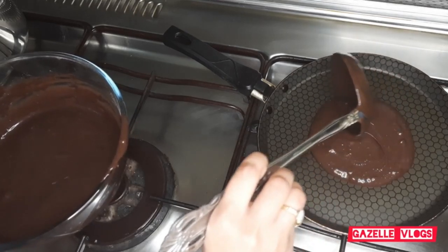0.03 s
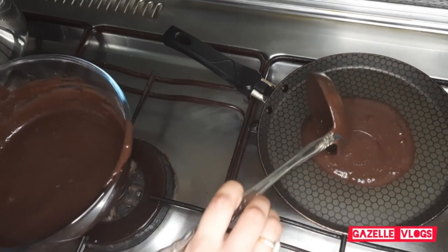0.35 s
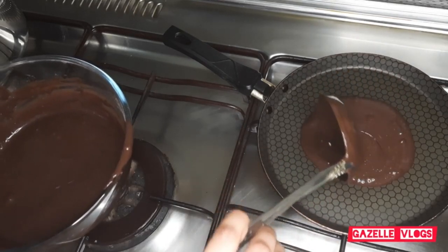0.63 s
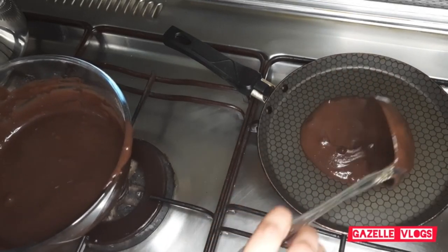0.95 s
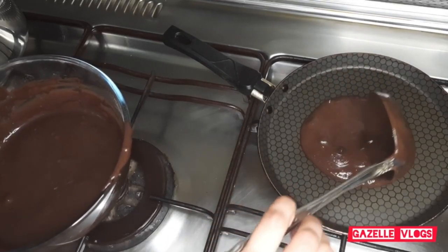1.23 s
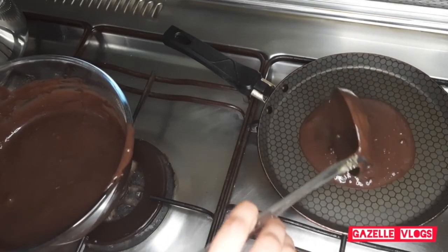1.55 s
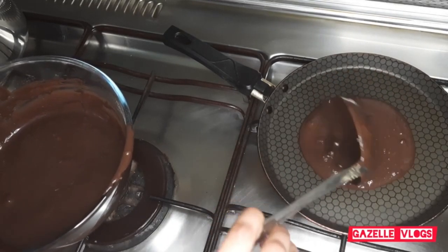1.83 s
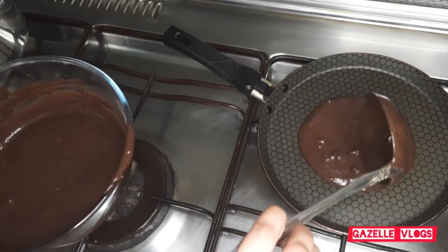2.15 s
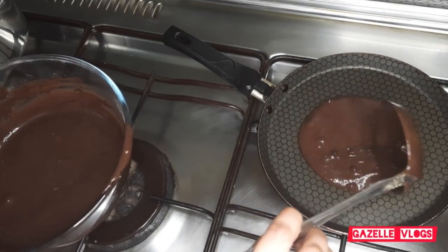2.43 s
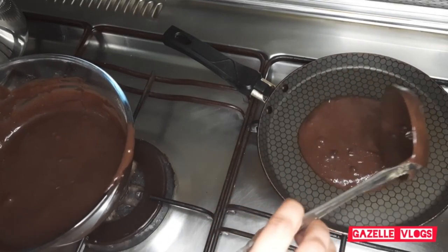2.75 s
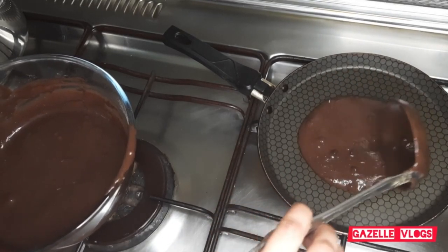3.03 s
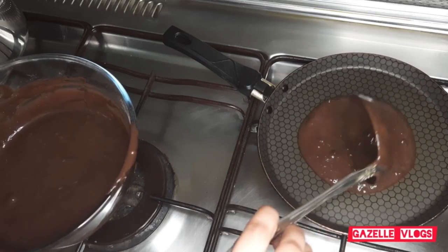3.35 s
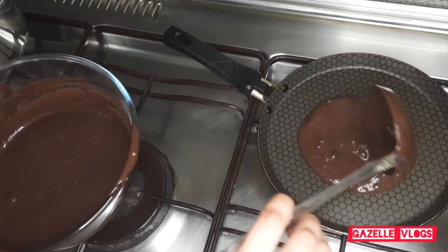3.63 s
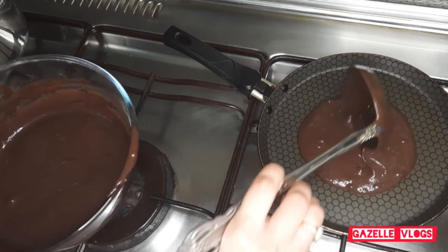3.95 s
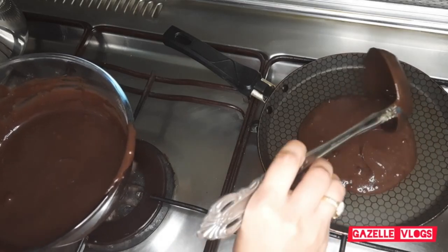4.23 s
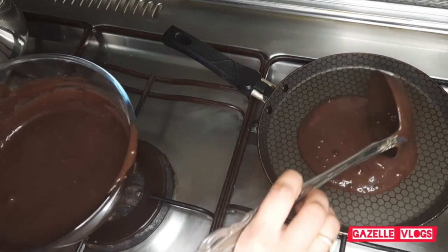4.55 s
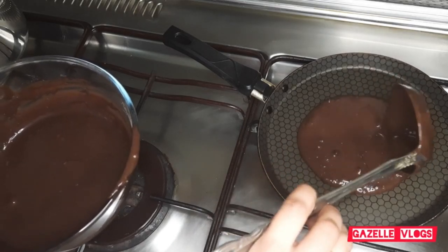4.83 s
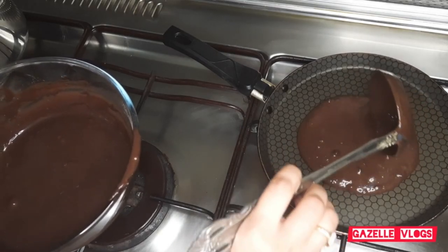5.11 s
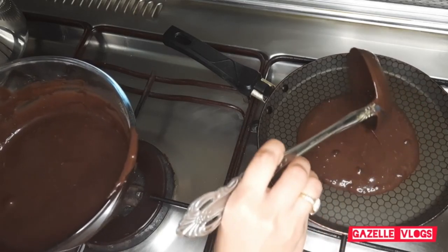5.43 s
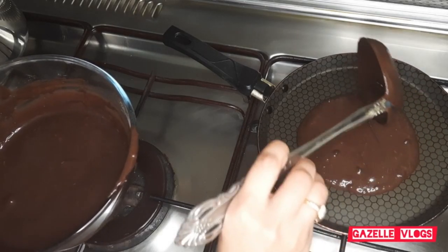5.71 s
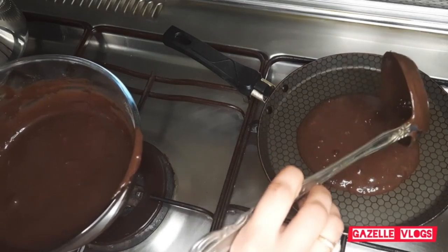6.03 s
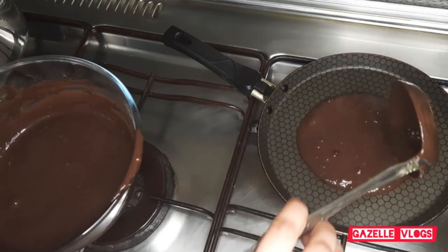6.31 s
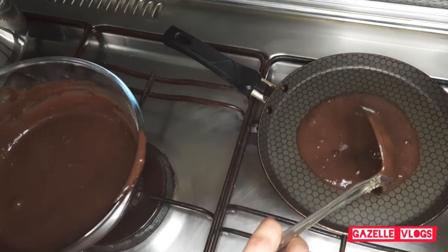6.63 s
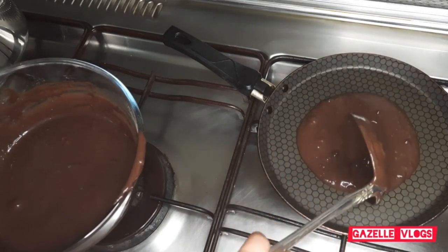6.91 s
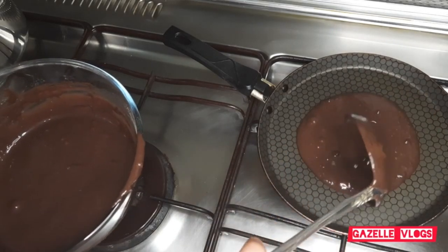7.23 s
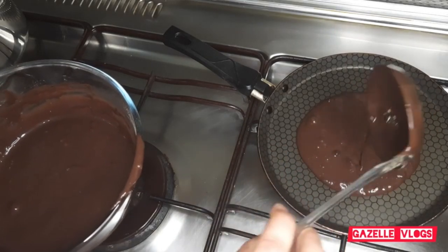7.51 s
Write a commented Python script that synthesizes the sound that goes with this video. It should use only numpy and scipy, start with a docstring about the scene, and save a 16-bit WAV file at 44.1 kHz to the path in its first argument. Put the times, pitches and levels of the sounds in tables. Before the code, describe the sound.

Batter sizzles softly in a hot pan, swelling with each ladle sweep, over a gas burner's rush and a low hum.

```python
"""Batter sizzling in a hot pan

A ladle spreads batter round a pan on a gas stove, a little to the right. Each sweep pushes
wet batter onto bare metal: a swarm of tiny steam bursts swells, then settles to a fine fizz
with lone pops. The ladle softly rubs the pan. Underneath, a kitchen motor and the mains hum,
the burner rushes and faintly sings, and a deep drone comes and goes."""
import sys
import numpy as np
from scipy import signal
from scipy.fft import rfft, irfft
from scipy.io import wavfile
from scipy.ndimage import uniform_filter1d

SR = 44100
rng = np.random.default_rng(int(sys.argv[2]) if len(sys.argv) > 2 else 0)


def wav_record(signal):
    """Record a signal, one row per channel, as 16-bit PCM in the file named by sys.argv[1]."""
    frames = np.transpose(np.atleast_2d(signal))
    bounded = np.clip(frames, -1, 1)
    # unit amplitude maps onto the largest positive 16-bit level
    quanta = np.round(bounded * 32767).astype(np.int16)
    wavfile.write(sys.argv[1], SR, quanta)


N = 342657
TIME = np.arange(N) / SR
FREQS = np.maximum(np.fft.rfftfreq(N, 1 / SR), 1)

# Tones of the motor, the mains and a slower hum that beats with them: pitch_hz, level_db
HUM_TONES = [(98.33, -50.7), (100, -64), (144.4, -57.5), (147.5, -52.5), (196.67, -52), (200, -70),
             (245.83, -69), (288.6, -73), (393.33, -73), (442.5, -77), (500, -78), (540.83, -69),
             (590, -73), (639.2, -79), (688.3, -79)]
# Spells of the deep drone: start_s, length_s, level_db
DRONE_SPELLS = [(-.3, 1.3, -43), (1.5, 0.71, -42), (2.345, 0.27, -44.5), (4.055, .32, -50)]
# The restless rumble under the drone: time_s, level_db
RUMBLE_LEVELS = [(0, -57), (3.2, -56.5), (3.75, -60), (4.6, -55.5), (5.4, -63), (6.3, -57), (7.77, -56)]
# Loudness of the burner's rush: time_s, level_db
FLAME_LEVELS = [(0, -53), (.8, -54), (1.3, -57), (2.1, -54), (3.8, -59.5), (4.4, -57), (5.0, -59.5),
                (5.5, -56), (6.3, -59.5), (7.77, -57.5)]
# Tone colour of that rush: frequency_hz, level_db
FLAME_SPECTRUM = [(25, -19), (60, -2.5), (90, -0.5), (135, 7.5), (170, -2), (215, 8), (275, -3.5),
                  (335, 0.5), (430, -4.5), (560, -5), (750, -13), (960, -17), (1300, -26.5), (3000, -31.5)]
# How it spreads between the ears: frequency_hz, share_alike (0 to 1), left_minus_right_db
FLAME_SPREAD = [(60.7, 1, -13), (188, 0.77, -0.5), (367, 0.59, 3), (690, 0.75, 3.5), (1370, 0, -3.5)]
# Where the gas jet rings the burner: pitch_hz, width_hz, level_db, left_minus_right_db
JET_RINGS = [(1746, 185, -77.5, 20), (3283, 105, -83, 4), (3640, 240, -84, -12), (6770, 440, -83, -19)]
# Faint whistles of the jet: pitch_hz, level_db
JET_WHISTLES = [(3392, -84.5), (3590, -84.5), (6535, -86.5)]
# Where the rubbed pan rings: pitch_hz, width_hz, level_db
PAN_RINGS = [(841, 40, 4.5), (972, 12.5, 1.5), (1070, 280, -5), (1540, 46, -18)]
# The ladle's back slides over the pan: middle_s, half_length_s, level_db
RUB_STROKES = [(.45, 1, -67.5), (1.874, 0.24, -66.5), (2.75, 0.76, -73), (5.4, 0.72, -73),
               (7.13, 0.56, -70)]
# Tone colour of the steam bursts: frequency_hz, left_db, right_db
STEAM_SPECTRUM = [(1270, -11, -11.5), (2560, -4, -15), (2610, -12, -10.5), (3820, -14.5, -3.5),
                  (5650, -11.5, -4.5), (6270, -9.5, -3.5), (6800, -17, 1.5), (7100, -16, -0.5),
                  (8320, -19, -0.5), (9740, -14, -7), (11020, -13.5, -1.5), (14100, -5, 0),
                  (15600, -6, -0.5)]
# How much of the steam both ears hear alike: frequency_hz, share_alike (0 to 1)
STEAM_SPREAD = [(2000, .02), (8000, .05), (11000, .25), (13500, .8), (15500, .9)]
# Larger bubbles that burst: time_s, level_db
BUBBLE_POPS = [(0.7542, -35), (0.9757, -42), (1.9784, -37), (2.0413, -39), (2.1221, -41), (3.1787, -31),
               (3.3682, -33.5), (3.5458, -27), (4.0502, -42), (4.5775, -40), (5.3009, -39), (5.5957, -39),
               (5.7014, -33.5), (5.7453, -37.5), (5.7683, -39), (5.9514, -42), (6.1474, -43), (6.1823, -44),
               (6.6303, -44), (6.9621, -42), (7.414, -44)]
# Where the hollow under the ladle rings: pitch_multiple, width_hz, level_db, left_minus_right_db
HOLLOW_RINGS = [(.7, 230, -21, 21), (1, 458, 4, 5.5)]
# Fizz of the batter already lying in the pan: time_s, level_db
SIMMER_LEVELS = [(0, -53), (.78, -54.5), (1.1, -71), (1.3, -69), (1.7, -64.5), (2.42, -67.5), (3.3, -63.5),
                 (4.6, -59.5), (5.0, -56.5), (5.45, -57.5), (6.4, -65), (7.77, -65)]
# Slow drift of the fizz's brightness: time_s, top_treble_boost_db
FIZZ_BRIGHTNESS = [(0, 0.5), (1.8, 2), (3.6, -3), (4.35, 1.5), (4.85, -2), (5.3, 0), (7.77, -1)]
# The ladle pushes wet batter onto bare metal:
# start_s, rise_s, length_s, fall_db_per_s, fizz_db, hiss_db, splutter_db, hollow_pitch_hz
LADLE_SWEEPS = [(-0.05, 0.046, .2, 18, -55, -65, -66.5, 1470),
                (0.64, 0.043, 0.14, 57, -57, -63.5, -80, 1900),
                (1.334, 0.092, 0.15, 84, -50.5, -59, -69, 2060),
                (1.67, 0.12, 0.29, 56, -53.5, -63.5, -75, 2000),
                (1.957, 0.12, 0.098, 114, -54, -60, -74, 2350),
                (2.453, 0.092, 0.17, 85, -57, -65.5, -86, 2400),
                (2.96, 0.082, 0.16, 81, -53, -61, -69.5, 2430),
                (3.235, 0.22, 0.25, 76, -59, -75, -79, 2400),
                (3.463, 0.1, 0.14, 79, -48, -58.5, -69.5, 2540),
                (3.837, 0.068, 0.1, 41, -60, -69.5, -86.5, 2400),
                (4.175, 0.089, 0.21, 60, -51, -63.5, -68.5, 2390),
                (4.702, 0.1, 0.14, 138, -46, -59.5, -65, 2600),
                (5.288, 0.099, .23, 79, -55, -64.5, -65.5, 2130),
                (6.846, 0.075, 0.11, 86, -59, -68, -87, 2300),
                (7.129, 0.087, 0.13, 80, -53, -63, -89, 2300)]


def undb(db):
    """Turn decibels into a number to multiply by."""
    return 10 ** (np.asarray(db) / 20)


def curves(table):
    """Join the points of a time table: one value per sample for each column."""
    times, *columns = np.transpose(table)
    return [np.interp(TIME, times, column) for column in columns]


def spectra(table):
    """Join the points of a frequency table: one value per frequency for each column."""
    hz, *columns = np.transpose(table)
    return np.array([np.interp(np.log(FREQS), np.log(hz), column) for column in columns])


def shape(x, gain):
    """Filter a sound: turn each frequency up or down by its gain."""
    return irfft(rfft(x) * gain, N)


def above(hz, order=8):
    """Gains that let through what lies above hz."""
    return 1 / np.sqrt(1 + (hz / FREQS) ** (2 * order))


def resonance(hz, width):
    """Gains that let through one peak around hz."""
    return 1 / (1 + ((FREQS - hz) / width) ** 2)


def unit(x, band_hz=(1, SR)):
    """Scale a stereo sound so the average of its sides has strength (rms) 1 inside a band."""
    inside = shape(x.mean(axis=0), (FREQS >= band_hz[0]) & (FREQS <= band_hz[1]))
    return x / inside.std()


def balance(db):
    """Left and right gains; positive db leans left."""
    return undb(np.array([[db], [-db]]) / 2)


def blend(three, alike):
    """Make left and right from one shared signal and two separate ones."""
    alike = np.clip(alike, 0, 1)
    return shape(three[0], np.sqrt(alike)) + shape(three[1:], np.sqrt(1 - alike))


def wander(rate_hz):
    """A smooth random wobble, typically of size 1."""
    x = shape(rng.standard_normal(N), 1 / (1 + (FREQS / rate_hz) ** 4))
    return x / x.std()


def surge(start, length, rise_s, fall_db_per_s):
    """A loudness curve: rise smoothly, hold until the length is up, then fade."""
    age = TIME - start
    rise = np.sin(np.pi / 2 * np.clip(age / rise_s, 0, 1)) ** 2
    return rise * undb(-fall_db_per_s * np.maximum(age - length, 0))


def hum(gain_db=-0.54, waver_db=0.77):
    """The motor and mains hold slightly wavering tones; close pairs throb against each other."""
    out = 0
    for hz, db in HUM_TONES:
        phase = 2 * np.pi * (hz * TIME + rng.random()) + .1 * wander(1.5)
        out = out + np.sqrt(2) * undb(db + waver_db * wander(5.3)) * np.sin(phase)
    return out * undb(gain_db) * balance(-1.2)


def drone(hz=46, wander_hz=1.03, spell_gain_db=-2.4, rumble_width_hz=4.4):
    """A deep, unsteady tone comes in spells, over a restless rumble at the same pitch."""
    phase = 2 * np.pi * np.cumsum(hz + wander_hz * wander(3.9)) / SR
    spells = sum(undb(db + spell_gain_db) * surge(start, length, rise_s=0.25, fall_db_per_s=100)
                 for start, length, db in DRONE_SPELLS)
    tone = np.sqrt(2) * np.sin(phase) * spells
    rumble = wander(rumble_width_hz) * np.sin(phase) + wander(rumble_width_hz) * np.cos(phase)
    return (tone + undb(curves(RUMBLE_LEVELS)[0]) * rumble) * balance(-3.3)


def flame(gain_db=-1.55, roll_off_hz=3500):
    """Burning gas makes a soft, flickering rush under the pan."""
    alike, side_db = spectra(FLAME_SPREAD)
    colour = undb(spectra(FLAME_SPECTRUM) + np.array([side_db, -side_db]) / 2)
    colour /= 1 + (FREQS / roll_off_hz) ** 4
    noise = blend(rng.standard_normal((3, N)), alike)
    rush = unit(shape(noise, colour), band_hz=(260, 1100))
    flicker_db = .5 * wander(8)
    return rush * undb(curves(FLAME_LEVELS)[0] + gain_db + flicker_db)


def gas_jet(waver_hz=4):
    """Gas hisses through the nozzle, makes the burner ring and whistles faintly."""
    out = 0
    for hz, width, db, side_db in JET_RINGS:
        ring = shape(rng.standard_normal((2, N)), resonance(hz, width))
        out = out + unit(ring * balance(side_db)) * undb(db + 2 * wander(22))
    for hz, db in JET_WHISTLES:
        phase = 2 * np.pi * np.cumsum(hz + waver_hz * wander(8.5)) / SR
        out = out + np.sqrt(2) * undb(db + 2 * wander(1.9)) * np.sin(phase)
    return out


def ladle_rub(gain_db=1.7, judder_db=2.0, light_touch_db=-88):
    """The ladle slides unevenly on a film of batter and softly rings the pan."""
    body = sum(resonance(hz, width) * undb(db) for hz, width, db in PAN_RINGS)
    friction = blend(rng.standard_normal((3, N)), alike=.3)
    ring = unit(shape(friction, body) * balance(2))
    strokes = sum(undb(db) ** 2 * np.exp(-((TIME - middle) / half) ** 2)
                  for middle, half, db in RUB_STROKES)
    power = undb(light_touch_db) ** 2 + strokes
    return ring * np.sqrt(power) * undb(gain_db + judder_db * wander(11))


def pan_squeak(middle_s=5.47, half_s=0.29, hz=975, glide_hz=25, level_db=-72):
    """During one slow stroke the rubbed pan sings two faint, slightly rising tones."""
    along = (TIME - middle_s) / half_s
    phase = 2 * np.pi * np.cumsum(hz + glide_hz * np.tanh(along) + 8 * wander(25.8)) / SR
    tones = np.sin(phase) + undb(-6) * np.sin(1.49 * phase)
    return np.sqrt(2) * tones * np.exp(-along ** 4) * undb(level_db + 2 * wander(15))


def swarm(per_s, spread_db):
    """Energies of randomly timed bursts, mostly small; the average power is the same at any rate."""
    chance = np.clip(per_s / SR, 1e-4, 1)
    sizes = undb(spread_db * np.minimum(rng.exponential(size=N), 6))
    return (rng.random(N) < chance) * sizes ** 2 / chance


def steam(energy, burst_s, echo_db, echo_s):
    """Each steam burst is a short puff of noise with a faint kitchen echo."""
    t = TIME[:SR // 3]
    decay = np.exp(-2 * t / burst_s) + undb(echo_db - 60 * t / echo_s) ** 2
    loudness = np.sqrt(np.abs(signal.fftconvolve(energy, decay)[:N]))
    return blend(loudness * rng.standard_normal((3, N)), spectra(STEAM_SPREAD)[0])


def pops(gain_db=4.0, low_cut_hz=5500):
    """Lone bubbles break with a sharp, thin tick."""
    energy = np.zeros(N)
    for time_s, db in BUBBLE_POPS:
        energy[int(time_s * SR)] += undb(db + gain_db) ** 2
    ticks = steam(energy, burst_s=.0009, echo_db=-32, echo_s=.15)
    return shape(ticks, undb(spectra(STEAM_SPECTRUM)) * above(low_cut_hz, order=2))


def splutter(gain_db=2.3, lag_s=0.023):
    """Steam gathers under the ladle just after a sweep starts and splutters in the hollow there."""
    bursts = steam(swarm(per_s=3000, spread_db=1.5), burst_s=.0012, echo_db=-20, echo_s=.3)
    out = 0
    for start, rise, length, fall, _, _, db, hz in LADLE_SWEEPS:
        hollow = sum(resonance(hz * multiple, width) * undb(ring_db) * balance(side_db)
                     for multiple, width, ring_db, side_db in HOLLOW_RINGS)
        ring = shape(bursts, hollow)
        swell = surge(start + lag_s, length, rise, fall)
        out = out + ring / ring.mean(axis=0).std() * swell * undb(db + gain_db)
    return out


def boiling_levels(simmer_hiss_db=-10.5, uneven_db=0.9):
    """Fizz and hiss levels in dB: a simmer plus a surge for each sweep, never quite even."""
    simmer_db = curves(SIMMER_LEVELS)[0]
    fizz, hiss = undb(simmer_db) ** 2, undb(simmer_db + simmer_hiss_db) ** 2
    for start, rise, length, fall, fizz_db, hiss_db, _, _ in LADLE_SWEEPS:
        swell = surge(start, length, rise, fall)
        fizz += (undb(fizz_db) * swell) ** 2
        hiss += (undb(hiss_db) * swell) ** 2
    return 10 * np.log10([fizz, hiss]) + uneven_db * wander(9.9)


def patchy_boil(x, patchy_db=1.5):
    """Patches of batter boil up and dry out, so narrow pitch ranges swell and fade on their own."""
    cells = signal.stft(x, nperseg=512)[2]  # a grid of frequency by time
    patches = rng.standard_normal(cells.shape[1:])
    for _ in range(2):
        patches = uniform_filter1d(patches, size=4, axis=0)
        patches = uniform_filter1d(patches, size=17, axis=1)
    gain = undb(patchy_db * patches / patches.std())
    return signal.istft(cells * gain / np.sqrt(np.mean(gain ** 2)))[1][:, :N]


def sizzle(peak_bursts_per_s=9000, split_hz=6300, fizz_gain_db=-0.58, hiss_gain_db=-3.0):
    """Tiny steam bursts fizz, denser when louder; coarser ones swell as batter meets bare metal."""
    fizz_db, hiss_db = boiling_levels()
    colour = undb(spectra(STEAM_SPECTRUM)) * above(570, order=4)
    treble = above(split_hz)
    per_s = peak_bursts_per_s * undb(fizz_db - fizz_db.max())
    fizz = steam(swarm(per_s, spread_db=3.5), burst_s=0.00065, echo_db=-14.5, echo_s=0.19)
    fizz = shape(fizz, colour * treble)
    top = shape(fizz, above(10000) ** 2)
    # Boiling harder than the usual -58 dB sounds brighter.
    brightness = undb(curves(FIZZ_BRIGHTNESS)[0] + 0.21 * (fizz_db + 58))
    fizz = unit(top * brightness ** .3 + (fizz - top) / brightness ** .7, band_hz=(6500, 15800))
    hiss = steam(swarm(per_s, spread_db=2.0), burst_s=0.0033, echo_db=-9.0, echo_s=0.11)
    hiss = unit(shape(hiss, colour * np.sqrt(1 - treble ** 2)), band_hz=(3900, 6000))
    return fizz * undb(fizz_db + fizz_gain_db) + hiss * undb(hiss_db + hiss_gain_db)


def scene():
    """Pan, stove and kitchen together."""
    cooking = patchy_boil(sizzle() + splutter()) + pops() + ladle_rub() + pan_squeak()
    return cooking + hum() + drone() + flame() + gas_jet()


def record(dry, widen_db=2.5, top_hz=15850):
    """The microphone pair widens the middle pitches; the highest treble is cut steeply."""
    mid, side = dry.mean(axis=0), (dry[0] - dry[1]) / 2
    side = shape(side, undb(widen_db * resonance(hz=1500, width=1100)))
    treble_cut = signal.ellip(12, .1, 70, top_hz, fs=SR, output="sos")
    return signal.sosfilt(treble_cut, [mid + side, mid - side])


dry = scene()
out = record(dry)
wav_record(out)
```